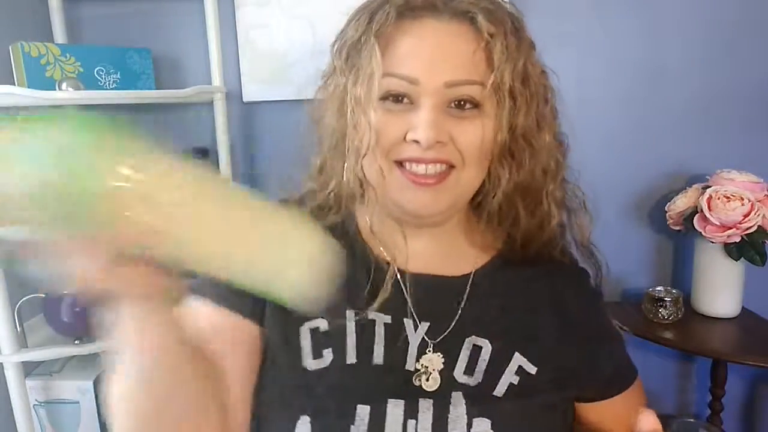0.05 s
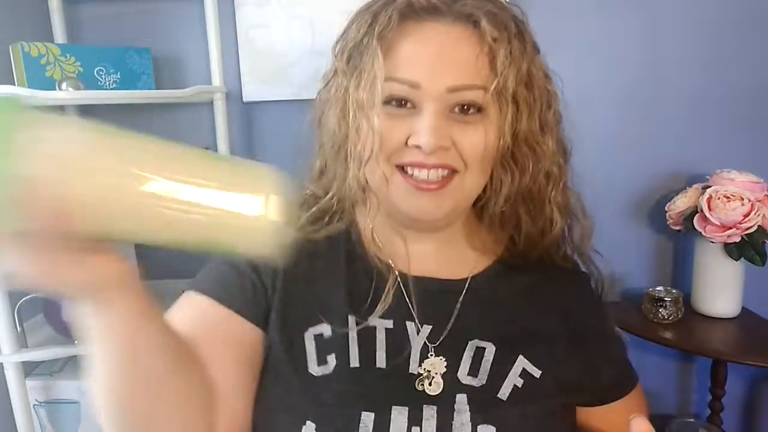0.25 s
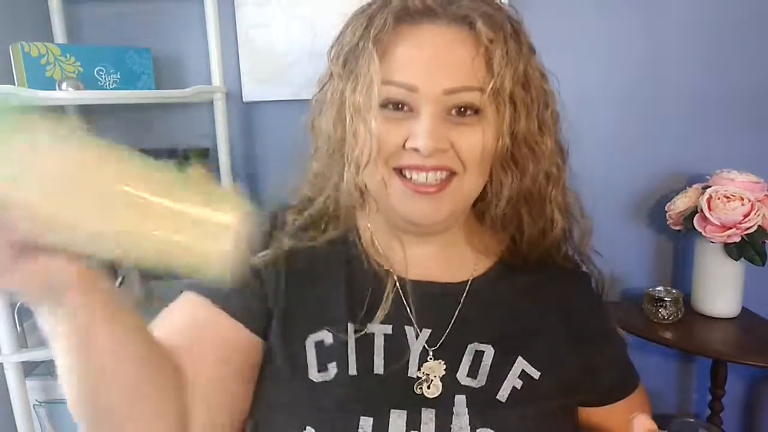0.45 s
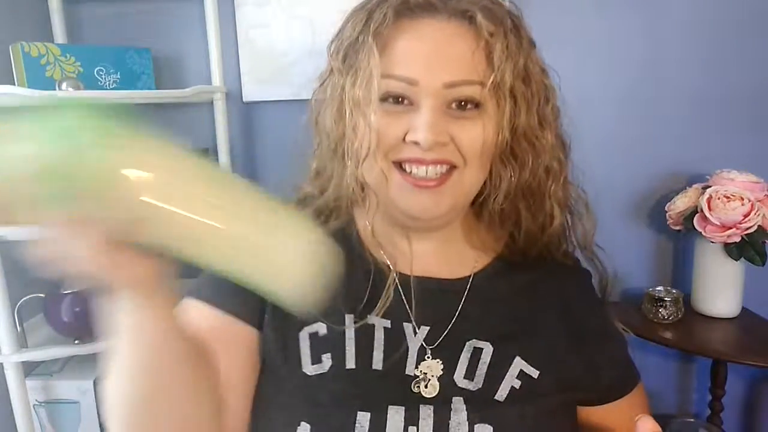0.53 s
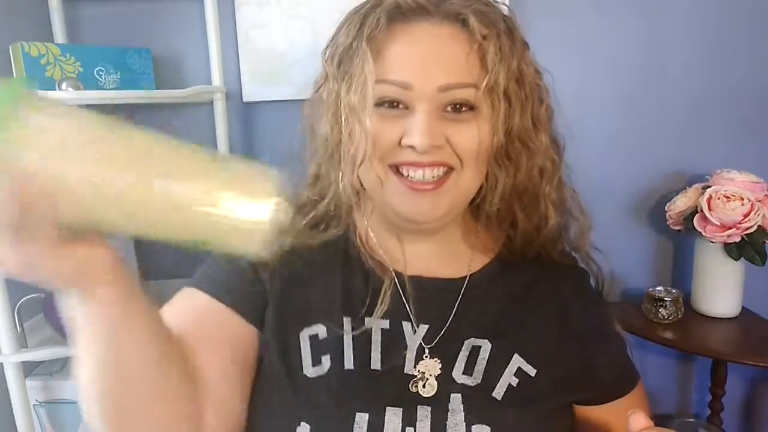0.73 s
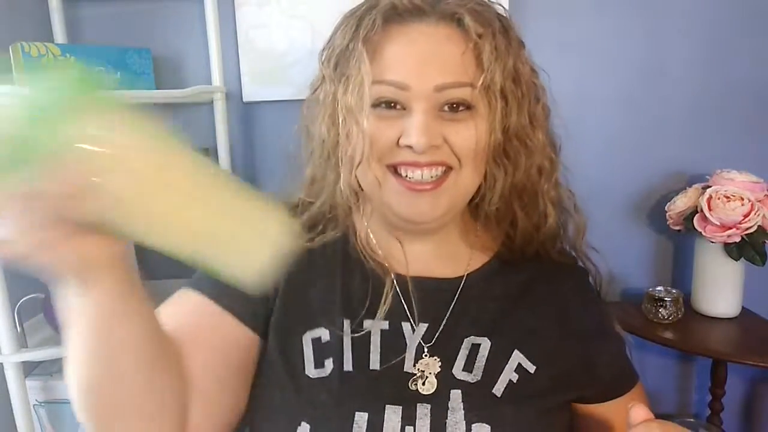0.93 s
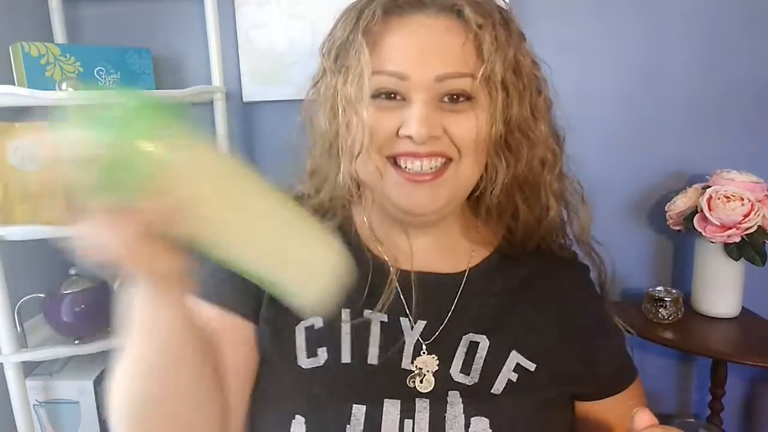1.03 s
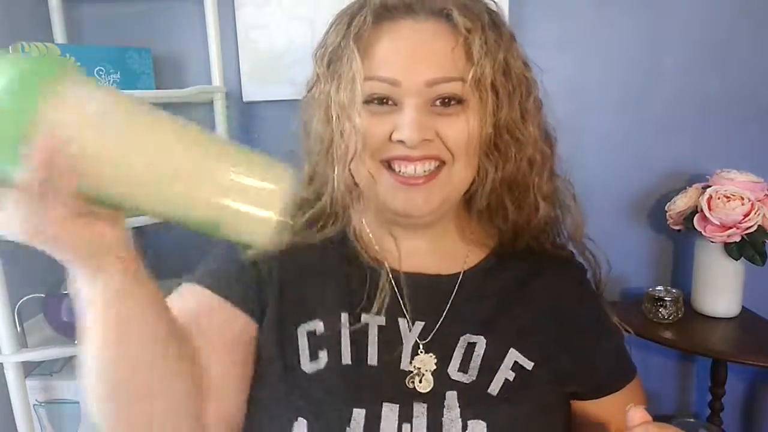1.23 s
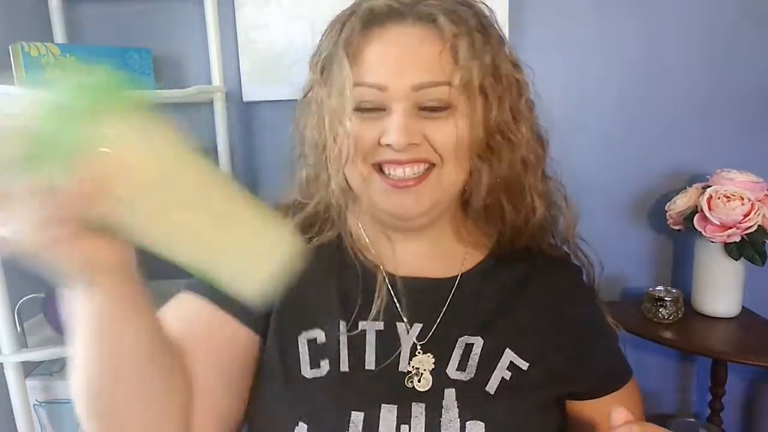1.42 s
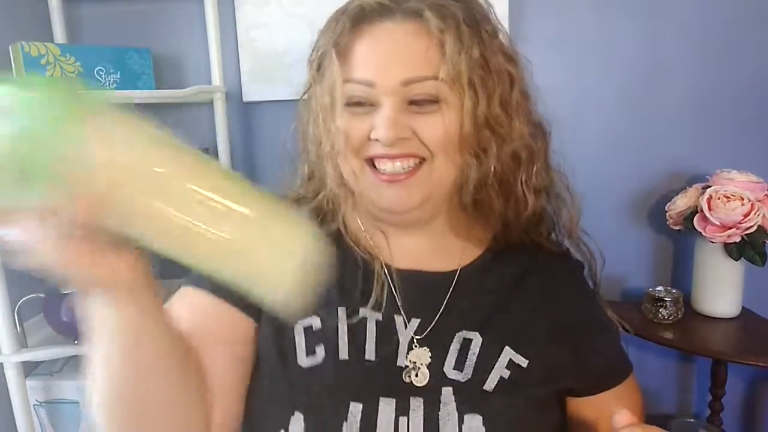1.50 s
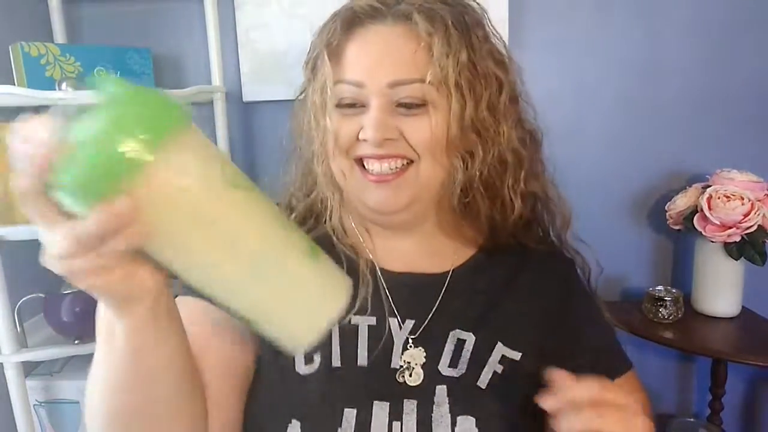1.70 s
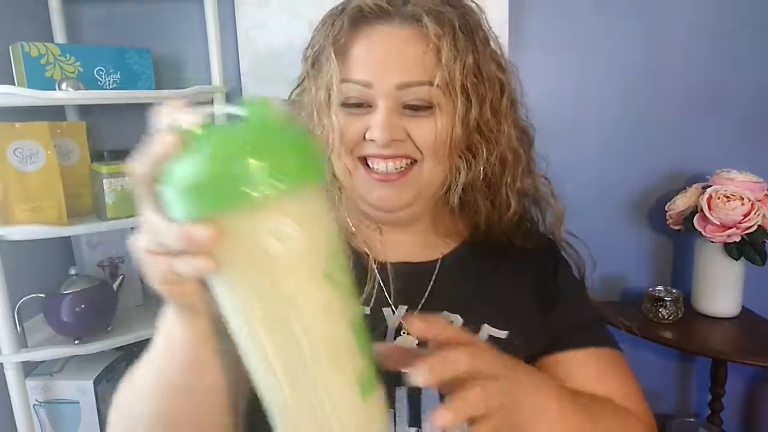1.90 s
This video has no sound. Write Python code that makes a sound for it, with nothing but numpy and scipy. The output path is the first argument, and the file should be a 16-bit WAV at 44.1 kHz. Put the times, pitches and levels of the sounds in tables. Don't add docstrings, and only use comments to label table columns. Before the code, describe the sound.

A plastic shaker bottle of thick drink is shaken vigorously close to a stereo microphone in a small room; hard hollow knocks with crisp rattles repeat about four times a second, then stop near the end.

```python
import sys
import numpy as np
from scipy import signal
from scipy.fft import rfft, irfft
from scipy.io import wavfile

SR = 44100
rng = np.random.default_rng(int(sys.argv[2]) if len(sys.argv) > 2 else 0)


def output_pcm(signal):
    pcm = np.clip(np.atleast_2d(signal).T, -1, 1) * 32767
    wavfile.write(sys.argv[1], SR, np.round(pcm).astype(np.int16))


def ratio_of_db(decibels):
    return 10 ** (np.asarray(decibels, float) / 20)


N = 85995
LEAD = 4410

# start_s, level_db, knock_hz, crack_re_knock_db, contact_ms
SLAMS = [(-.06, -23.5, 970, 2, 2.5), (0.031, -30.5, 457, -39, 6.3), (.178, -33, 1400, -14, 4.1),
         (0.1834, -20.5, 1157, 3.5, 3.5), (.185, -22, 406, -31, 8.8), (0.4116, -33.5, 1110, -2, 11),
         (0.4158, -17.5, 814, 0.5, 1.5), (0.4237, -22.5, 1430, -32, 3), (0.645, -28, 1280, -7, 4.3),
         (0.652, -21, 1200, 1, 3.5), (.655, -27.5, 374, -31, 18), (.906, -30, 336, -25, 13),
         (0.896, -34.5, 1430, -6, 7.7), (.904, -21.5, 774, 1.5, 1.4), (0.9098, -49, 1480, -30, 3),
         (1.14, -23.5, 820, -9, 1.2), (1.141, -26.5, 405, -13, 15), (1.1484, -28, 1400, 4, 0.81),
         (1.368, -62, 1800, 12, 2.3), (1.3764, -23, 1760, 1, 0.99), (1.382, -22.5, 754, -5.5, 6.7),
         (1.619, -23, 837, -16, 0.41)]


def table(hz, rows):
    rows = np.array(rows, float)
    return np.interp(np.log(np.maximum(hz, 1)), np.log(rows[:, 0]), rows[:, 1])


def shape(x, gain):
    n = x.shape[-1]
    return irfft(rfft(x) * gain(np.arange(n // 2 + 1) * SR / n), n)


def unit(x):
    return x / np.sqrt(np.mean(x ** 2))


def unit_energy(x):
    return x / np.linalg.norm(x)


def timeline_s():
    return (np.arange(N + LEAD) - LEAD) / SR


def impacts(rows):
    # mode_hz, t60_s
    bottle_modes = [(335, 0.045), (430, 0.035), (530, 0.034), (690, 0.028), (800, 0.019), (965, 0.012),
                    (1240, 0.025), (1400, 0.025), (1555, 0.013), (1790, 0.021), (1930, 0.02), (2150, 0.014),
                    (2500, 0.023), (3140, 0.0059)]
    # freq_hz, gain_db
    crack_spectrum = [(700, 2), (1500, -36), (2800, 5.5), (4000, 4), (5200, 7), (7000, 3), (10000, -10.5),
                      (15000, -4.5)]
    size, crack_delay = 4096, 16
    grain_db, rattle_db, rattle_ms, click_db = 2, 6, 3.3, 23
    knock_width_oct, mode_scatter_db, mode_detune, blow_db = 0.45, 1.5, 0.032, 7
    hit_db, crack_top_hz = -4.5, 9700

    t = np.arange(size) / SR
    mode_hz, t60_s = np.array(bottle_modes).T
    rattle = ratio_of_db(rattle_db) * np.exp(-1000 * t / rattle_ms)
    out = np.zeros((2, N + LEAD + size))
    for start_s, level_db, knock_hz, crack_db, contact_ms in rows:
        contact_ms = max(contact_ms, 0.2)
        spikiness = ratio_of_db(grain_db * rng.exponential(size=size))
        grains = rng.standard_normal(size) * spikiness
        spray = grains * (np.exp(-1000 * t / contact_ms) + rattle)

        scatter, detune = rng.standard_normal((2, len(mode_hz)))
        octaves_off = np.log2(mode_hz / knock_hz) / knock_width_oct
        mode_gain = ratio_of_db(mode_scatter_db * scatter - 6 * octaves_off ** 2)
        ringing = np.sin(2 * np.pi * np.outer(mode_hz * (1 + mode_detune * detune), t))
        ringing *= 1000. ** -np.outer(1 / t60_s, t)
        body = mode_gain / mode_hz @ ringing
        body = np.diff(body * (1 - np.exp(-t * knock_hz * 1.6)), prepend=0)
        sprayed = unit_energy(signal.fftconvolve(spray, body)[:size])
        knock = sprayed + ratio_of_db(blow_db) * unit_energy(body) / contact_ms

        def crack_gain(f):
            delayed = ratio_of_db(table(f, crack_spectrum)) * np.exp(-2j * np.pi * f * crack_delay / SR)
            return delayed / np.hypot(1, (f / crack_top_hz / ratio_of_db(crack_db)) ** 2)

        crack = shape(spray + ratio_of_db(click_db) * (t == 0) / contact_ms, crack_gain)
        pair = np.array([unit_energy(knock), ratio_of_db(crack_db) * unit_energy(crack)])
        i = int(start_s * SR) + LEAD
        out[:, i:i + size] += ratio_of_db(level_db + hit_db) * 8 * pair
    return out[:, :N + LEAD]


def bubbles(level_db, decay_s, centre_hz, pops_per_s):
    t = timeline_s()
    envelope = np.zeros(len(t))
    for start_s, slam_db, *_ in SLAMS:
        envelope += ratio_of_db(slam_db) * (t > start_s) * np.exp(-np.abs(t - start_s) / decay_s)
    pops = (rng.random(len(t)) < pops_per_s / SR) * rng.standard_normal(len(t))
    band = shape(pops, lambda f: 1 / (1 + 0.8j * (f / centre_hz - centre_hz / (f + 1))) ** 2)
    return ratio_of_db(level_db) * envelope * unit(band)


def froth():
    return bubbles(level_db=-24, decay_s=0.024, centre_hz=2200, pops_per_s=2300)


def slosh():
    return bubbles(level_db=-25, decay_s=0.03, centre_hz=602, pops_per_s=900)


def room(x):
    # freq_hz, t60_s
    decay = [(250, 0.5), (1000, 0.41), (4000, 0.34), (12000, 0.32)]
    level_db, first_echo_ms, top_hz = -14.5, 0.83, 8100
    mid_cut_hz = 693
    t = np.arange(SR // 2) / SR
    onset = np.clip((1000 * t - first_echo_ms) / 3, 0, 1)
    tail = np.zeros((2, len(t)))
    for hz in 125 * 2. ** np.arange(8):
        noise = rng.standard_normal((2, len(t)))
        band = shape(noise, lambda f: np.exp(-2 * np.log2((f + 1) / hz) ** 2) / (1 + f / top_hz))
        tail += band * onset * 1000. ** (-t / table(hz, decay))
    tail /= np.linalg.norm(tail[1])
    mid, side = signal.fftconvolve(x[None], tail, axes=1)[:, :len(x)]
    mid = shape(mid, lambda f: f / np.hypot(f, mid_cut_hz))
    return ratio_of_db(level_db) * np.array([mid, side])


def hum():
    # freq_hz, density_db (per Hz)
    mid_spectrum = [(25, -26), (50, -7.5), (110, 3.5), (250, -2), (700, -8), (2000, -5), (4500, -12.5),
                    (8000, -19), (15000, -20)]
    side_spectrum = [(25, -44), (50, -24), (110, 0), (250, -6), (700, -7), (2000, -10), (4500, -17),
                     (8000, -27), (15000, -32)]

    def noise(level_db, rows):
        white = rng.standard_normal(N)
        return ratio_of_db(level_db) * unit(shape(white, lambda f: ratio_of_db(table(f, rows)) * (f < 16500)))

    return np.array([noise(-68.5, mid_spectrum), noise(-63, side_spectrum)])


def ticks():
    # start_s, level_db, knock_hz, crack_re_knock_db, contact_ms
    lumps = [(.077, -45, 1900, 1, 1.1), (.082, -45, 1560, -5.5, 3.9), (.152, -36, 2160, 2.5, 1),
             (.2715, -34, 2450, 3, 0.86), (.317, -36.5, 1600, 0, 2.7), (.397, -52, 2770, 3, 1.6),
             (.553, -44.5, 2460, 0.5, 1.2), (.567, -42.5, 2400, -3.5, 2), (.627, -32, 1286, -15, 3.5),
             (.777, -42.5, 2200, 4, 9), (.797, -37.5, 1500, 0, 7.8), (.873, -41.5, 1900, -3, 9),
             (1.053, -39, 1720, 1, 1.4), (1.116, -47.5, 2780, 2, 13), (1.1245, -42, 2920, 5.5, 1.4),
             (1.436, -36, 1330, -4, 4.8), (1.5225, -30.5, 1100, -8.5, 1.7), (1.535, -34.5, 2200, -8.5, 1),
             (1.642, -33, 840, -8, 1.3), (1.656, -35.5, 2740, 4.5, 3), (1.685, -35, 1460, -28, 0.42)]
    return impacts(lumps)


def squeak():
    start_s, rise_s, centre_hz, width_hz, level_db = 1.895, 0.015, 2020, 15, -68
    t = timeline_s()
    noise = rng.standard_normal(len(t))
    tone = shape(noise, lambda f: 1 / (1 + ((f - centre_hz) / width_hz) ** 2))
    return ratio_of_db(level_db) * unit(tone) * np.clip((t - start_s) / rise_s, 0, 1)


def ports(direct):
    # freq_hz, gain_db
    left_shading = [(300, -2), (800, -1), (1500, -2), (2500, -9), (5000, -11), (10000, -6)]
    lag_s, near_db = 0.155e-3, 0.5
    left = shape(direct, lambda f: -ratio_of_db(table(f, left_shading)) * np.exp(-2j * np.pi * f * lag_s))
    return ratio_of_db(near_db) * np.array([left, direct])[:, LEAD:]


def scene():
    knock_to_room_db, pan_db = -5, 1.6
    knock, crack = impacts(SLAMS) + ticks()
    rest = crack + froth() + slosh() + squeak()
    mid, side = room(rest + ratio_of_db(knock_to_room_db) * knock)[:, LEAD:] + hum()
    diffuse = np.array([(mid + side) / ratio_of_db(pan_db), (mid - side) * ratio_of_db(pan_db)])
    return ports(knock + rest) + diffuse


def top_cut(x):
    return signal.sosfilt(signal.butter(12, 16530, fs=SR, output="sos"), x)


def record(dry):
    top_hz, dc_offset = 15700, -0.0003
    mix = shape(dry, lambda f: 1 / np.sqrt(1 + (f / top_hz) ** 60)) + dc_offset
    return top_cut(mix)


dry = scene()
out = record(dry)
output_pcm(out)
```